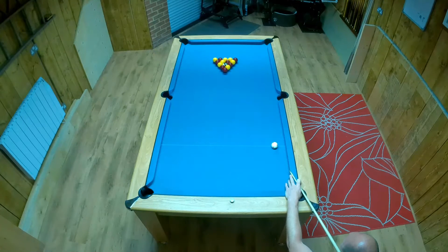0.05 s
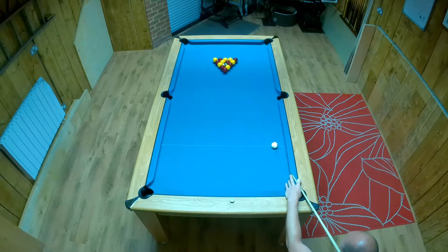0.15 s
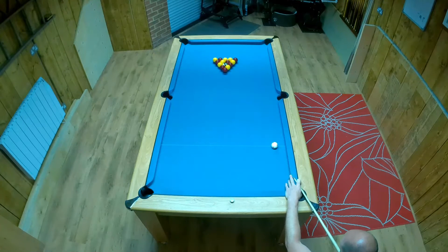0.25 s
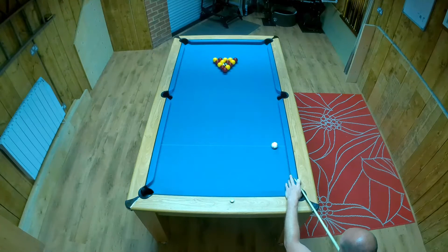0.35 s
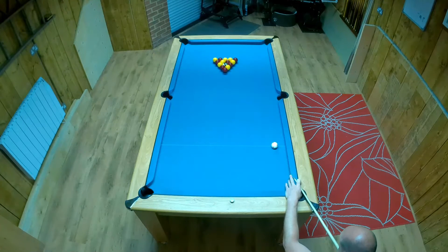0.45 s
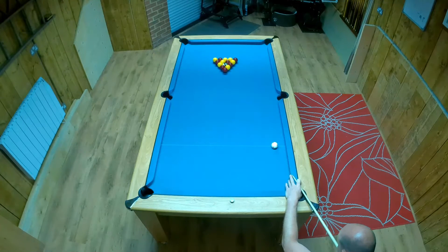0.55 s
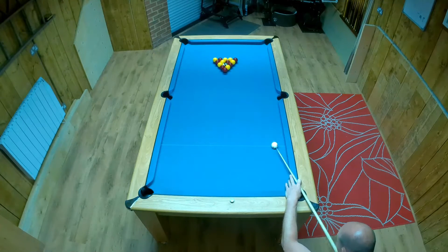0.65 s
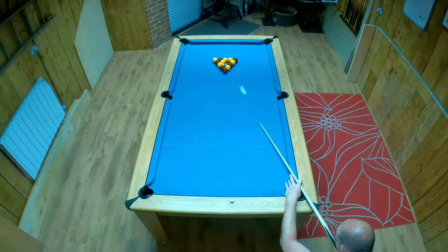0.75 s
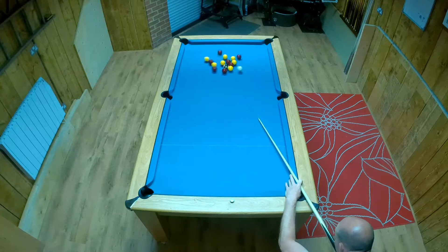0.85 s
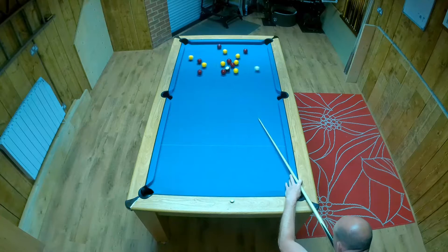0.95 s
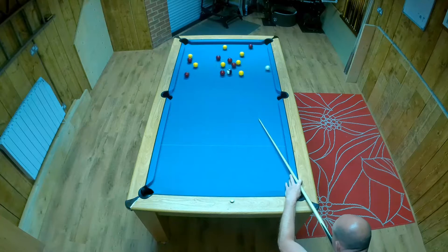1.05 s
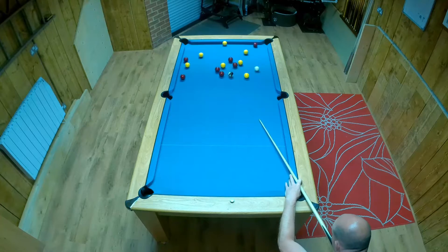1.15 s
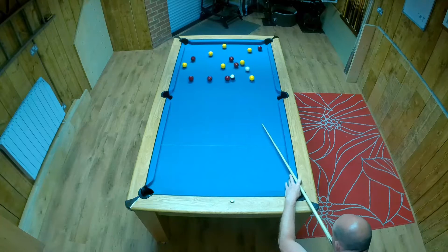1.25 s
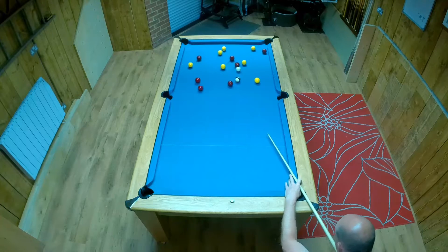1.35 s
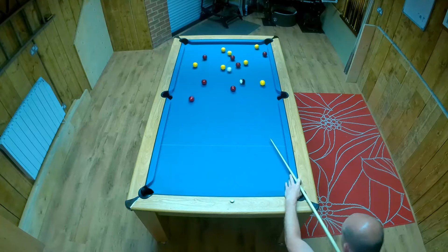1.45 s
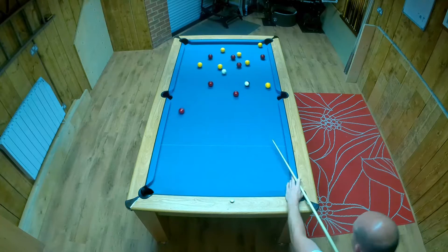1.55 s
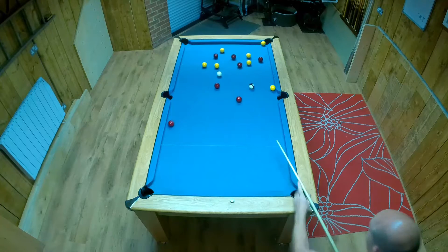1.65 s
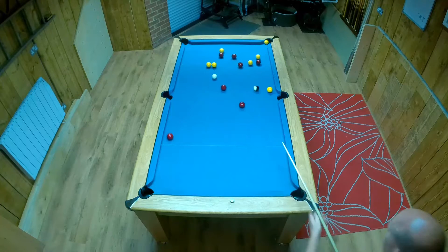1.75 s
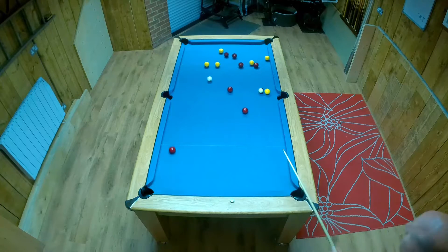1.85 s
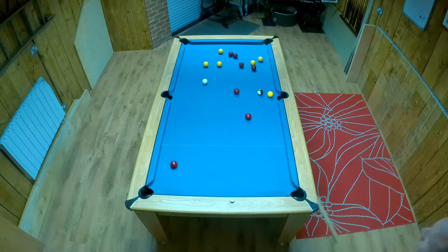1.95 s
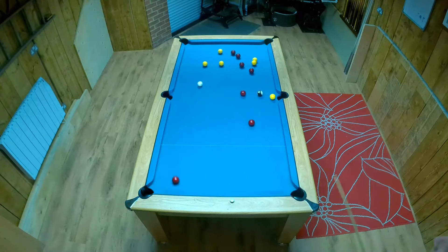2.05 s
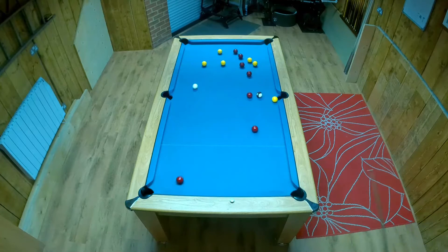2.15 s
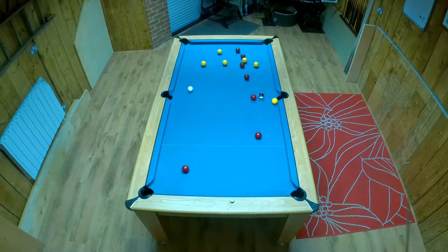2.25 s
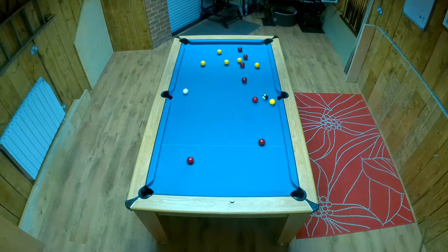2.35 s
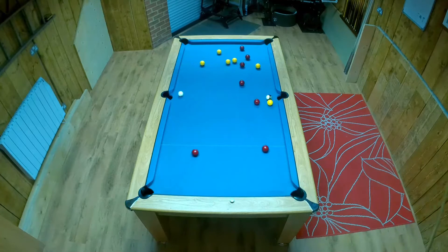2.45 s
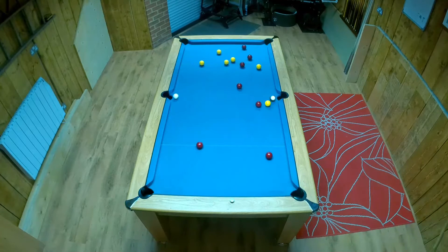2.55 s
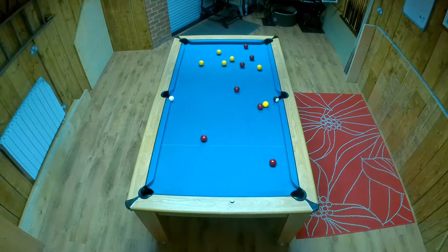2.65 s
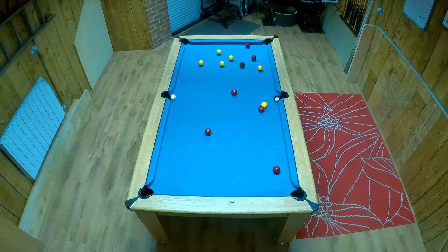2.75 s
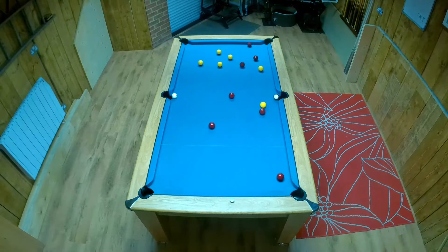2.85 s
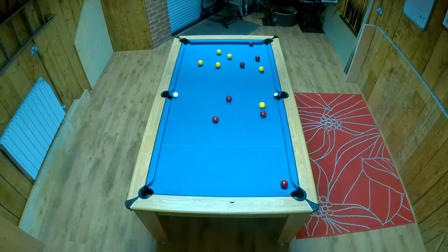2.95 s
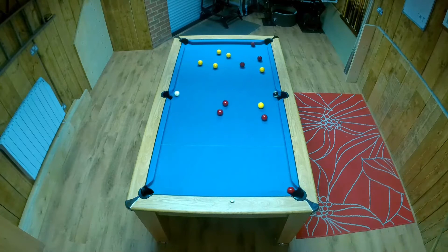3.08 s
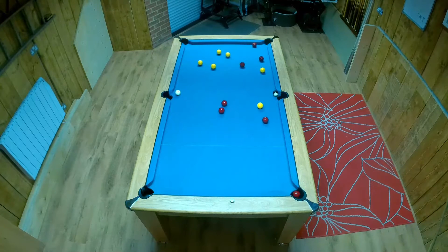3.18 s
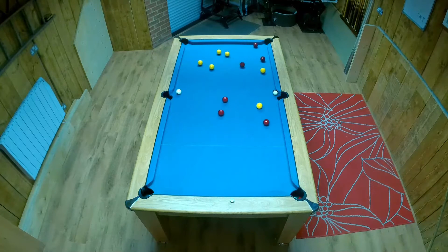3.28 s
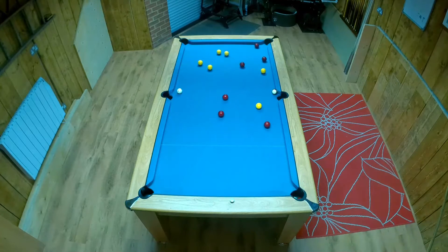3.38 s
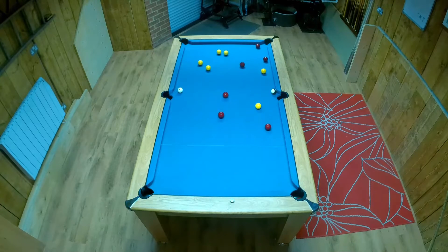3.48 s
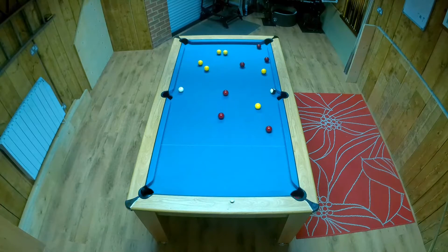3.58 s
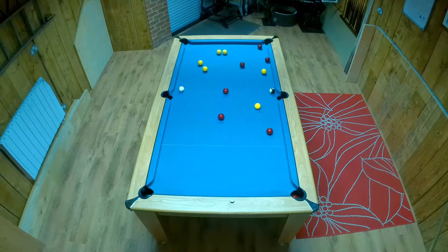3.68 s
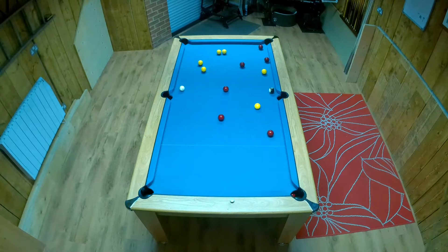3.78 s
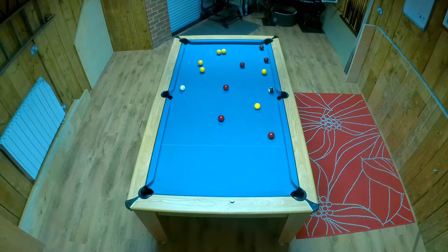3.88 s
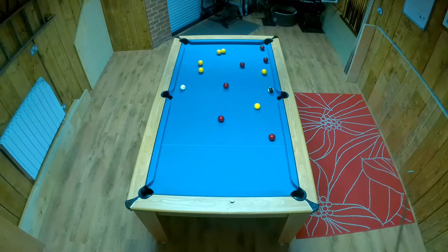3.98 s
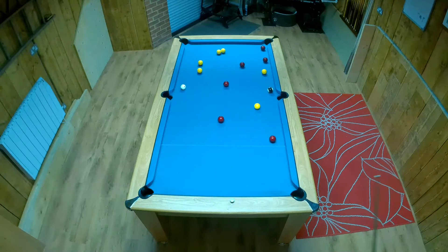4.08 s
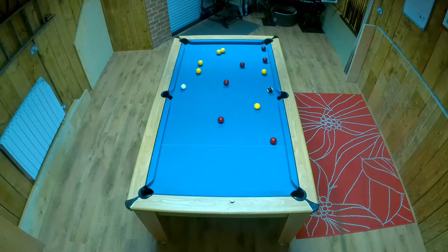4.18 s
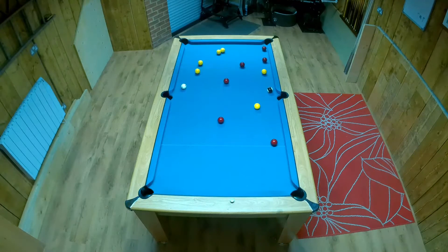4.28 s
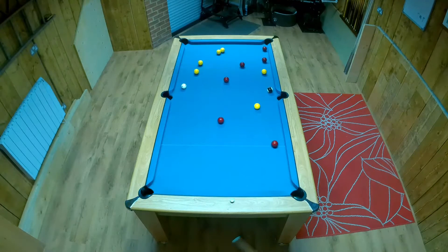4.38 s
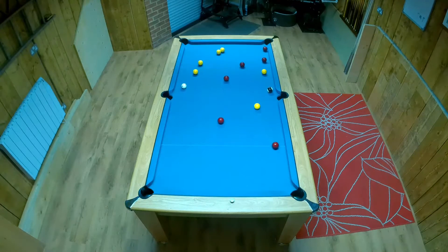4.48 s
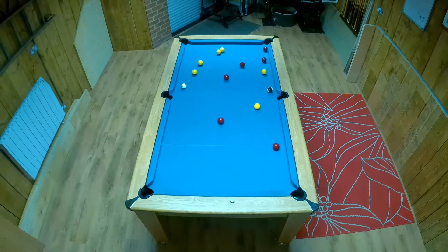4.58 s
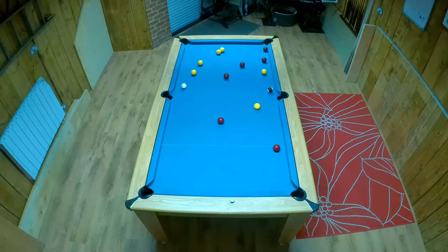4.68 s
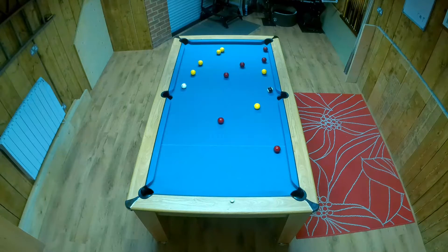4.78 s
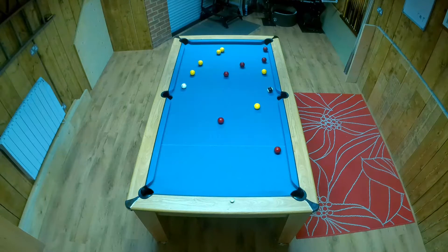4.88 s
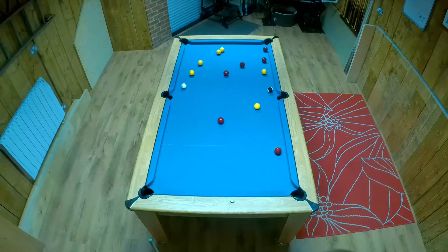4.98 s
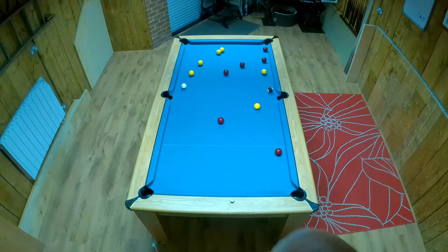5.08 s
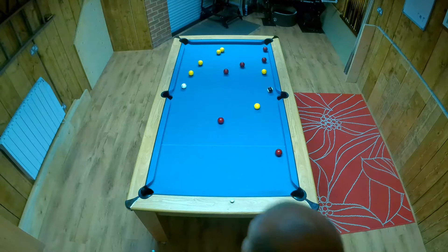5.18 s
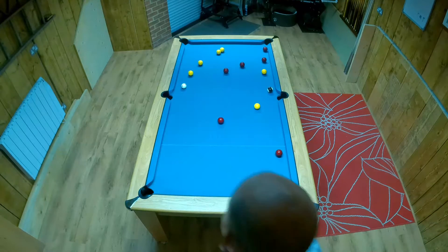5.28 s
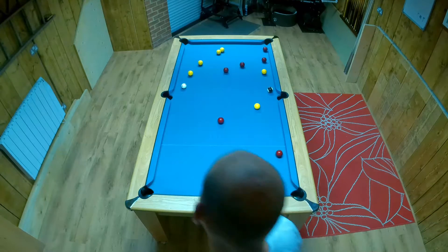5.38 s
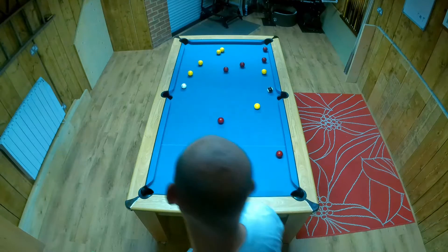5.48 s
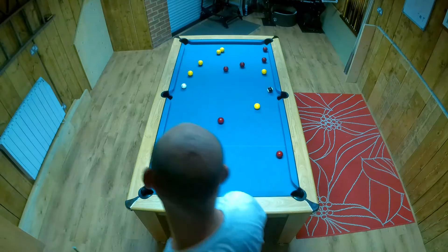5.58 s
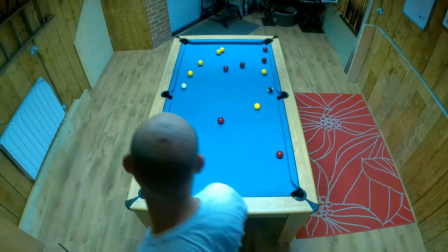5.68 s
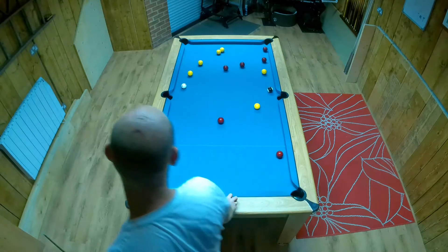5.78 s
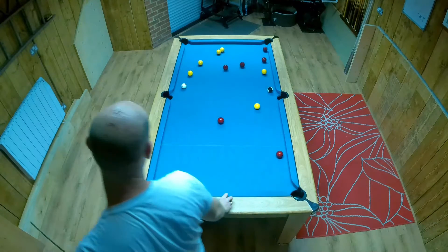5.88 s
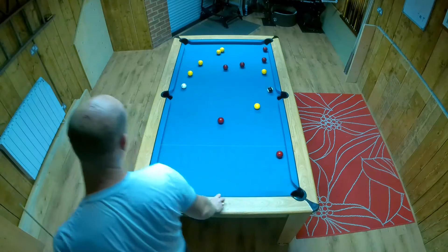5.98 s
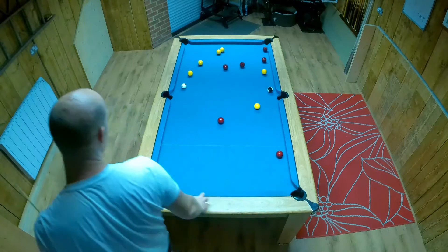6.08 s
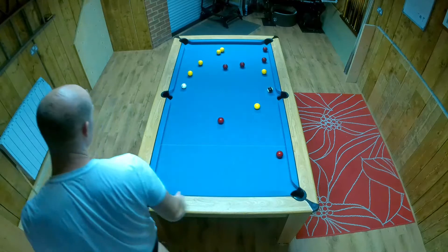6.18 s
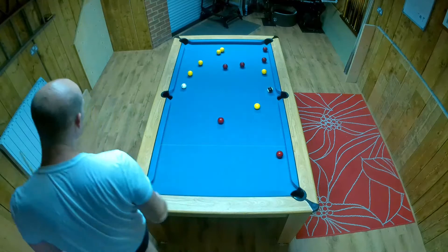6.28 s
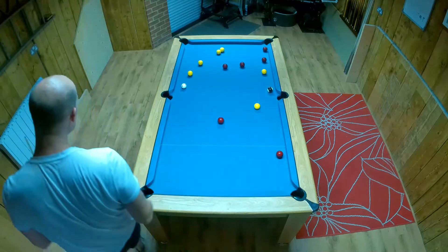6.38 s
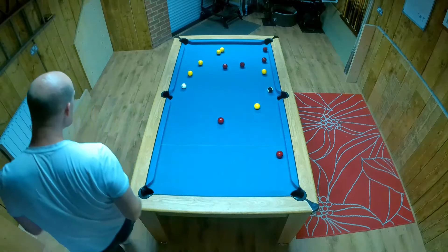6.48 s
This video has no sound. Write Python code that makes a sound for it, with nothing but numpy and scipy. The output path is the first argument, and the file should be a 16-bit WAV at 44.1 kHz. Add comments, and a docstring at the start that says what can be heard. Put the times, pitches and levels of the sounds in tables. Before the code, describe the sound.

Heard from high over one end of a pool table in a slightly echoing room, a cue hit leads straight into a hard, bright break. Scattered clacks and dull cushion thumps follow over a soft rolling rumble. One ball drops into a far pocket, then another into a near one, followed by hollow wooden knocks through the cabinet. The player's clothes and soles brush quietly at the end.

```python
"""A break shot at a pool table

Heard from high above the table's end, in a wood-panelled room. The cue cracks, the rack bursts, and
balls clack together and thud into cushions. Two drop into pockets and knock along the wooden return
run. Underneath are balls rolling on cloth, a low room rumble, and the player's steps and clothes."""
import sys
import numpy as np
from scipy import signal
from scipy.fft import rfft, irfft
from scipy.io import wavfile
from scipy.ndimage import uniform_filter1d, minimum_filter1d

SR = 44100
rng = np.random.default_rng(int(sys.argv[2]) if len(sys.argv) > 2 else 0)


def dump(signal):
    """Clip the signal to [-1, 1] and save it as 16-bit WAV at the path in sys.argv[1]."""
    limited = np.clip(np.atleast_2d(signal).T, -1, 1)
    pcm = np.round(limited * 32767).astype(np.int16)
    wavfile.write(sys.argv[1], SR, pcm)


N = 287973

SHOT_S = .7753  # when the cue strikes
SIZE = 32768  # samples in one hit with its echo
T, HZ = np.arange(SIZE) / SR, np.fft.rfftfreq(SIZE, 1 / SR)

# The tone of four sounds. Each row: frequency in Hz, level in dB.
BOOM_TONE = [(30, -36), (60, -28), (85, -10.5), (150, -6.5), (220, -8.5), (320, -24.5), (600, -35.5),
             (2000, -77.5)]  # the table's hollow cabinet
WOOD_TONE = [(40, -36.5), (150, -22.5), (320, -4), (520, -4.5), (680, -6), (900, -7), (1200, -14),
             (1700, -18.5), (2500, -33), (4000, -46.5), (12000, -73)]  # a knock on a board
TICK_TONE = [(200, -23), (1200, 5), (2200, 0), (3300, -3), (5200, -9.5), (6500, -22), (8500, -23.5),
             (12000, -45)]  # a tap on a hard surface
ROLL_TONE = [(30, -32), (70, 0.5), (110, 7.5), (165, -1.5), (250, -8.5), (500, -13.5), (1000, -20.5),
             (1600, -40), (3000, -43.5), (8000, -55.5)]  # a rolling rumble
# The notes the cabinet rings at. Each row: pitch in Hz, width in Hz, boost in dB.
CABINET_NOTES = [(110.8, 15, -1.5), (136, 11.5, 4.5), (150.8, 5.5, 4.5), (163.5, 12, 8.5), (217.2, 14, 7),
                 (310.8, 22, 8), (478.5, 24, 2.5), (511.4, 11, 9.5), (827.7, 26.1, 9.5), (915, 53.7, 8),
                 (989, 12, 9.5), (1049, 7.3, 4.5)]


def clacks(soft_bright=0.96, doubling_db=40.5, direct_db=-23, room_db=-0.5, scatter=0.522):
    """Hard balls meet without ringing: one short pulse, louder by way of the ceiling than direct."""
    # Each row: time in seconds, strength in dB.
    hits = [(0.9083, 27.5), (0.9108, 29.5), (0.9132, 28), (0.9230, 28.5), (.9350, 16.5), (0.943, 10),
            (0.96, 14), (1.285, 10), (1.3583, 0.5), (1.499, 4.5), (1.5904, 2.5), (1.858, 5.5),
            (2.0430, -1.5), (2.3246, 2), (2.5925, 3.5), (2.7925, -14), (3.257, 9.5)]
    # The tone of a clack. Each row: frequency in Hz, level in dB.
    clack_tone = [(60, -37), (300, -29), (600, -20.5), (1000, -3.5), (1500, -5), (2100, -5.5), (2800, -6),
                  (3400, -16.5), (3950, -21.5), (4600, -35), (6000, -61.5), (11000, -83.5)]
    # Echoes off the ceiling and lamp. Each row: delay in seconds, level in dB.
    ceiling_echoes = [(.0066, -6.5), (.0081, -5.5), (.0094, -6.5), (0.011, -3)]
    # Narrow peaks that colour the clacks' echo. Each row: pitch in Hz, width in Hz, boost in dB.
    echo_peaks = [(1227, 7.7, 7.5), (1394, 59, 5.5), (1660, 20, 5), (1610, 23, 7.5), (1782, 42, 3.5),
                  (2674, 110, 7), (2868, 40.1, -0.5), (2987, 42, 5), (2920, 16, 8)]
    out = np.zeros(N)
    lead = 128  # samples kept for the rise before the pulse's peak
    ceiling = sum(amp(db) * delay(s) for s, db in ceiling_echoes)
    echo_tone = amp(room_db) * rfft(blow(resonance(echo_peaks), delay(.003)))
    for s, db in hits:
        bright = soft_bright * (1 + amp(db - doubling_db))  # harder hits are shorter, so brighter
        spot = rng.standard_normal(SIZE) * np.exp(-T / 0.00073)  # each spot colours the echo its own way
        colour = (1 + scatter * rfft(spot / np.linalg.norm(spot))) / np.hypot(1, scatter)
        paths = amp(direct_db) - ceiling * colour + echo_tone * room_echo()
        pulse = irfft(amp(db) * shape(clack_tone, HZ / bright) * paths)
        add(out, s - lead / SR, np.roll(pulse, lead))
    return out


def cue(strength_db=23, direct_db=-8.5, room_db=-2.5):
    """The tip hits the white ball and the stick rings."""
    # The tone of the tip on the ball. Each row: frequency in Hz, level in dB.
    tip_tone = [(50, -16.5), (170, -1.5), (400, -4), (700, -4.5), (1200, -1.5), (1600, -10), (2300, -22),
                (4000, -22), (6000, -29.5), (8500, -34), (11000, -46), (16000, -60.5)]
    # The notes the stick rings at. Each row: pitch in Hz, width in Hz, boost in dB.
    stick_notes = [(513.6, 20, 7), (800.5, 73, 9), (874, 150, 11), (958, 12, 14), (1215, 91, 4.5),
                   (1460, 22, 7), (1921, 28, 10.5), (2820, 40, 1.5), (3470, 40, 12), (5870, 690, 10)]
    out = np.zeros(N)
    paths = amp(direct_db) + amp(room_db) * room_echo()
    add(out, SHOT_S, blow(amp(strength_db) * shape(tip_tone, HZ) * resonance(stick_notes), paths))
    return out


def thumps(wood_db=-11, wood_db_per_octave=7.5):
    """Dull, low thumps: balls meeting rubber cushions, and one soft footstep."""
    # Each row: time in seconds, strength in dB, brightness as a factor on frequency.
    hits = [(1.0220, 32, 1.04), (1.061, 26.5, 0.92), (1.146, 29, 1.06), (1.225, 25.5, 0.6),
            (1.285, 20, 0.47), (1.352, 16, 0.45), (2.221, 14.5, 0.86), (2.7850, 16, 0.56),
            (3.919, 20, 0.55), (4.5150, 10.5, 0.55)]  # the last row is the footstep
    out, body = np.zeros(N), resonance(CABINET_NOTES)
    for s, db, bright in hits:
        wood = amp(wood_db + wood_db_per_octave * np.log2(bright)) * shape(WOOD_TONE, HZ / bright)
        tone = body * np.hypot(shape(BOOM_TONE, HZ), wood)
        add(out, s, amp(db) * blow(tone, cabinet_paths(direct_db=-8)))
    return out


def knocks(boom_db=3, boom_db_per_octave=-2, rebound_s=.009, rebound_db=-1.5):
    """A ball hits slate or wood and rebounds: boards knock, the cabinet booms, the surface ticks."""
    # Each row: time in seconds, strength in dB, brightness factor, tick in dB relative to the knock.
    hits = [(0.863, 18, 0.8, -57), (.9130, 24, 1.24, -13.5), (1.9456, 25, 0.99, -20),
            (1.992, 9.5, 1.17, -21), (2.413, 9, 1.2, -21.5), (3.124, 11.5, 0.64, -45),
            (3.181, 28, 0.74, -44), (3.3570, 25, 0.91, -44), (3.3740, 25.5, 0.72, -46),
            (3.418, 22.5, 0.8, -51), (3.473, 21.5, 0.73, -43), (3.517, 27, 0.64, -34.5),
            (3.966, 13.5, 0.74, -55), (4.1410, 12, 1.08, -26), (4.947, 22.5, 0.59, -42),
            (5.059, 23, 0.67, -27.5), (5.3470, 22, 0.89, -35), (5.632, 17, 0.45, -50)]
    out, body = np.zeros(N), resonance(CABINET_NOTES)
    rebound = amp(rebound_db) * delay(rebound_s)
    for s, db, bright, tick_db in hits:
        boom = amp(boom_db + boom_db_per_octave * np.log2(bright)) * shape(BOOM_TONE, HZ)
        boards = shape(WOOD_TONE, HZ / bright)
        tick = amp(tick_db) * shape(TICK_TONE, HZ / bright)
        tone = body * np.linalg.norm([boom, boards, tick], axis=0)
        both_contacts = cabinet_paths(direct_db=-17) + rebound * cabinet_paths(direct_db=-17)
        add(out, s, amp(db) * blow(tone, both_contacts))
    return out


def pockets(note_hz=973, rise_s=0.0021, room_db=-5, snap_bright=1.66, snap_lead_s=.0025):
    """A ball slaps a pocket's liner, which snaps, then gives one short, hollow tock."""
    # Far pocket, then near. Each row: time in seconds, then tock, snap and direct path levels in dB.
    drops = [(1.9490, -13, -25, -31), (3.3589, -11.5, -4.5, 0)]
    out, age = np.zeros(N), T / rise_s
    tock = rfft(age * np.exp(1 - age) * np.sin(2 * np.pi * note_hz * T))
    for s, tock_db, snap_db, direct_db in drops:
        paths = amp(direct_db) + amp(room_db) * room_echo()
        add(out, s, amp(tock_db) * irfft(tock * paths))
        snap = blow(shape(TICK_TONE, HZ / snap_bright), amp(direct_db - 12) + room_echo())
        add(out, s - snap_lead_s, amp(snap_db) * snap)
    return out


def rolling(cloth_db=-51.5, slowing_db_per_s=1.5, rise_db_per_s=76, fall_db_per_s=115):
    """Rolling balls make the slate and cabinet rumble: a slow fade, with a swell for each fast run."""
    # The rack scatters, a ball circles into a pocket, then it runs down the return.
    # Each row: time of the peak in seconds, level in dB.
    fast_runs = [(1.101, -30.5), (3.42, -34), (5.251, -40.5)]
    t = np.arange(N) / SR
    fade = (t > SHOT_S) * amp(cloth_db - slowing_db_per_s * (t - SHOT_S))
    swells = [amp(db - np.maximum(rise_db_per_s * (s - t), fall_db_per_s * (t - s)))
              for s, db in fast_runs]
    rumble = noise(lambda hz: shape(ROLL_TONE, hz) * np.interp(hz, HZ, resonance(CABINET_NOTES)), N)
    return np.linalg.norm([fade, *swells], axis=0) * rumble


def walk(start_s=5.65, rise_s=0.14, level_db=-53.5, bright=1.64):
    """The floor rumbles softly as the player walks round the table."""
    fade_in = np.clip((np.arange(N) / SR - start_s) / rise_s, 0, 1)
    return amp(level_db) * fade_in * noise(lambda hz: shape(ROLL_TONE, hz / bright), N)


def brushes():
    """Clothes and soles rub in soft swells of noise as the player moves."""
    # Each row: start in seconds, length in seconds, level in dB, centre in Hz, spread in octaves.
    moves = [(2.138, 0.04, -63, 6860, 0.19), (2.163, 0.061, -49, 1410, 0.53),
             (5.77, 0.069, -59.5, 925.9, 0.84), (5.79, 0.089, -67, 3889, 0.62),
             (6.15, 0.045, -63.5, 5400, 0.22), (5.85, 0.8, -63.5, 463, 0.81)]
    out = np.zeros(N)
    for s, length, db, centre_hz, octaves in moves:
        size = int(length * SR)
        rub = noise(lambda hz: np.exp(-.5 * (np.log2((hz + 1) / centre_hz) / octaves) ** 2), size)
        add(out, s, amp(db) * rub * np.sin(np.linspace(0, np.pi, size)))
    return out


def background(rumble_db=-49.5, swell_db=1.5, swell_hz=5, hiss_db=-64.5):
    """A low room rumble swells unevenly under a steady hiss."""
    # The tone of each. Each row: frequency in Hz, relative level in dB.
    rumble_tone = [(20, -6.5), (48, -25.5), (68, -2.5), (88, -1), (120, -11.5), (140, -18), (170, -12),
                   (200, -19), (260, -19.5), (330, -28), (600, -39.5), (1500, -75)]
    hiss_tone = [(100, 2), (350, -1), (500, 7), (620, 2.5), (1000, 2.5), (1700, -4), (3100, -10.5),
                 (4900, -8), (8000, -16.5), (10500, -14.5), (12500, -17.5), (15800, -16.5)]
    swell = noise(lambda hz: np.exp(-(hz / swell_hz) ** 2), N)
    rumble = amp(rumble_db + swell_db * swell) * noise(lambda hz: shape(rumble_tone, hz), N)
    return rumble + amp(hiss_db) * noise(lambda hz: shape(hiss_tone, hz), N)


def room_echo():
    """Spectrum of the room's echo from one spot: each band builds up and dies at its own speed."""
    # Each row: centre in Hz, seconds to fade by 60 dB, build-up time in seconds.
    bands = [(59.9, 0.14, 0.003), (152, 0.3, 0.005), (354, 0.29, 0.0028), (786, 0.38, 0.0013),
             (1586, 0.4, 0.0017), (3008, 0.35, 0.003), (5970, 0.31, 0.0026), (13000, 0.12, .002)]
    scatter, out = rfft(rng.standard_normal(SIZE)), np.zeros(SIZE)
    centres = np.log([row[0] for row in bands])
    for pick, (_, fade_s, build_s) in zip(np.eye(len(bands)), bands):
        band = np.interp(np.log(HZ + 1), centres, pick)
        echo = irfft(scatter * band) * amp(-60 * T / fade_s) * (1 - np.exp(-T / build_s))
        out += echo * np.sqrt(np.mean(band ** 2) / np.sum(echo ** 2))
    return rfft(out)


def cabinet_paths(direct_db, echo_db=-13, echo_s=0.0056, room_db=-2.5):
    """Spectrum of the ways from cabinet to ear: direct, by one early echo, and round the room."""
    return amp(direct_db) + amp(echo_db) * delay(echo_s) + amp(room_db) * room_echo()


def blow(tone, paths):
    """A sharp push that rings on with the given tone and travels the given paths."""
    log_gain = np.log(np.maximum(tone, 1e-6))
    mirrored = np.r_[log_gain, log_gain[-2:0:-1]]
    push = np.exp(np.conj(signal.hilbert(mirrored)))  # minimum phase: the energy comes at the start
    return irfft(push[:len(HZ)] * paths)


def resonance(notes):
    """Gain at each frequency when the given notes are boosted."""
    return 1 + sum((amp(db) - 1) / (1 + (2 * (HZ - hz) / width) ** 2) for hz, width, db in notes)


def shape(tone, hz):
    """Gain at each frequency, found by joining the points of a tone table."""
    points_hz, db = np.transpose(tone)
    return amp(np.interp(np.log(hz + 1), np.log(points_hz + 1), db))


def noise(gain, size):
    """Noise with the spectrum gain(hz), scaled to an average (rms) level of 1."""
    x = irfft(rfft(rng.standard_normal(size)) * gain(np.fft.rfftfreq(size, 1 / SR)), size)
    return x / x.std()


def delay(s):
    """Multiplying a spectrum by this makes its sound s seconds late."""
    return np.exp(-2j * np.pi * HZ * s)


def amp(db):
    """Turns decibels into gain."""
    return 10 ** (np.asarray(db) / 20)


def add(mix, s, sound):
    """Lays a sound into the mix at s seconds."""
    part = mix[max(round(s * SR), 0):][:len(sound)]
    part += sound[:len(part)]


def scene():
    """The shot, the player and the room, in one channel."""
    table = cue() + clacks() + thumps() + knocks() + pockets() + rolling()
    return (table + walk() + brushes() + background())[None]


def record(dry, limit=1.0, recovery_db_per_s=900, clip_level=.91, cutoff_hz=15900):
    """A fast limiter turns the break down, the highest peaks still clip, and the top treble is cut."""
    regained_db = recovery_db_per_s * np.arange(N) / SR
    over_db = 20 * np.log10(np.maximum(abs(dry) / limit, 1))
    held_db = np.maximum.accumulate(over_db + regained_db, axis=1) - regained_db
    gain = uniform_filter1d(minimum_filter1d(amp(-held_db), size=21), size=21)
    clipped = np.clip(dry * gain, -clip_level, clip_level)
    low_pass = signal.firwin(511, cutoff_hz, window=("kaiser", 9), fs=SR)
    return signal.oaconvolve(clipped, low_pass[None], "same")


dry = scene()
out = record(dry)
dump(out)
```